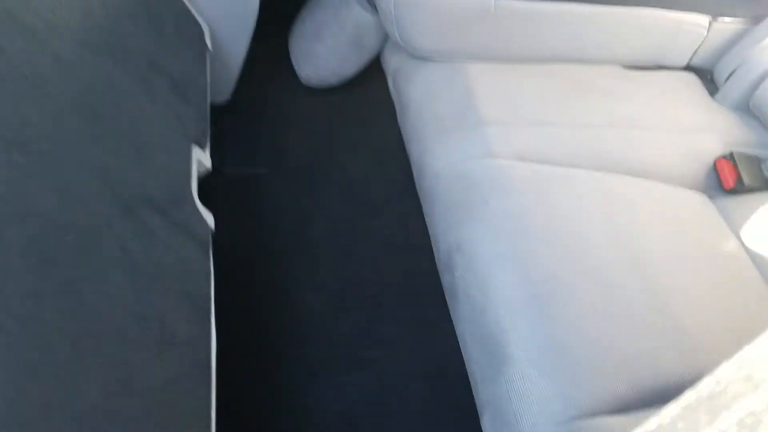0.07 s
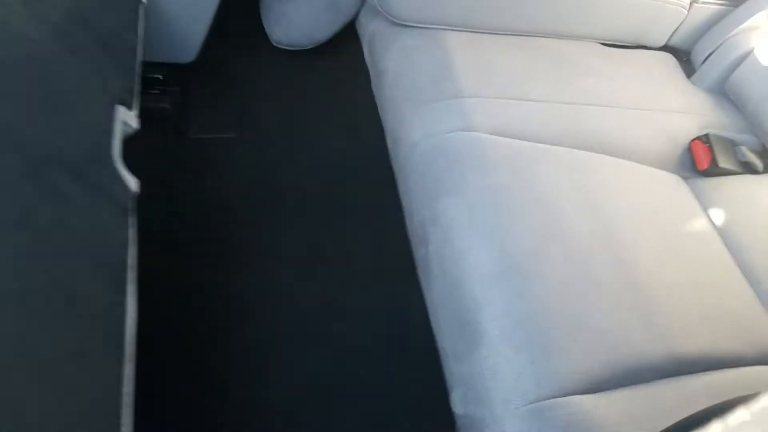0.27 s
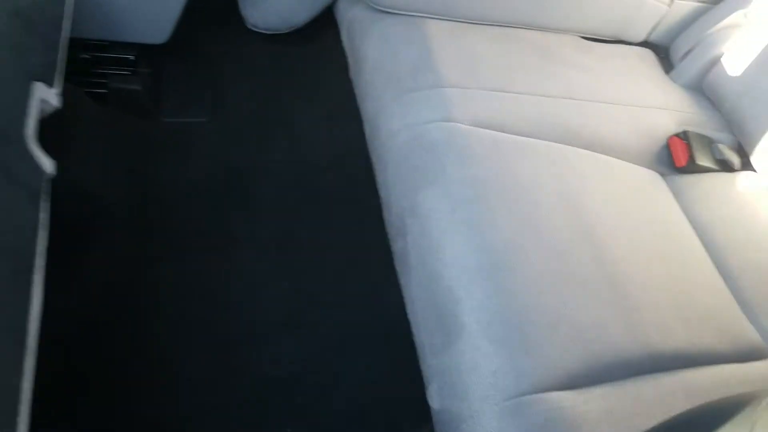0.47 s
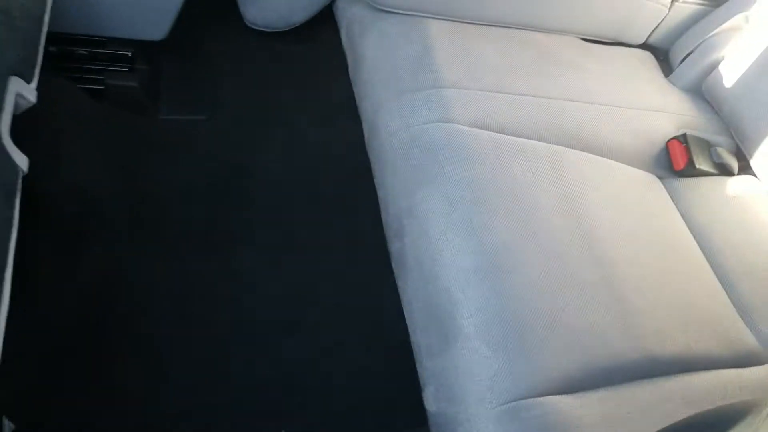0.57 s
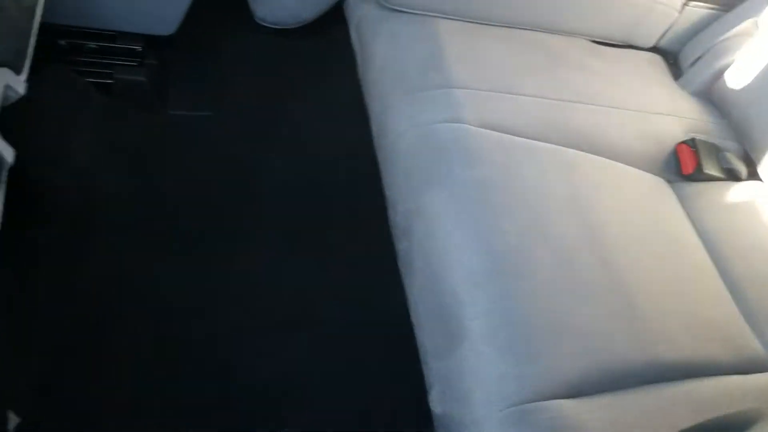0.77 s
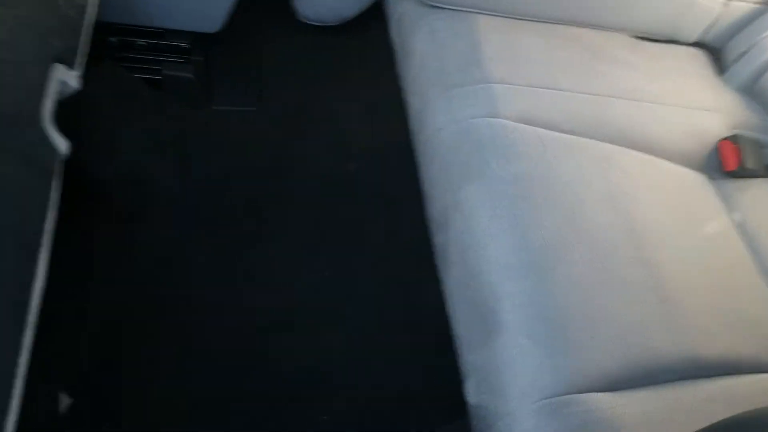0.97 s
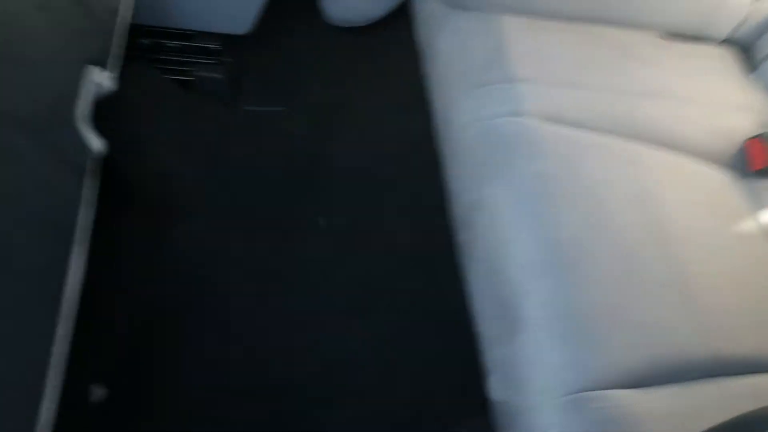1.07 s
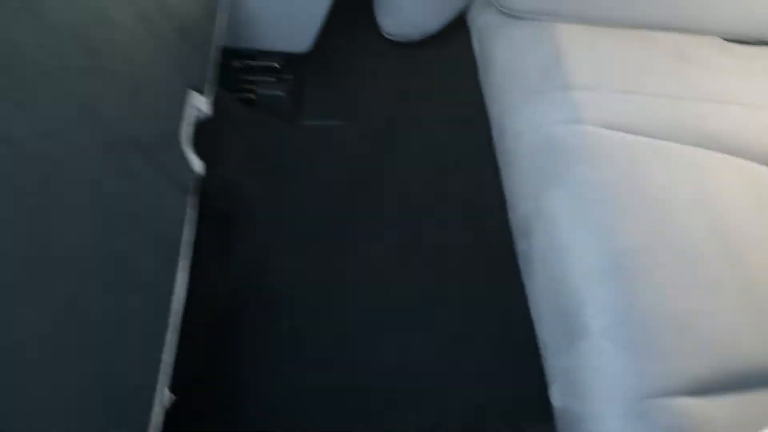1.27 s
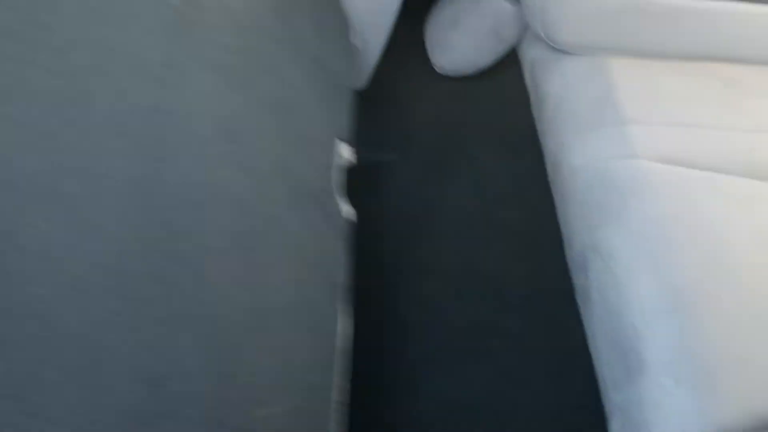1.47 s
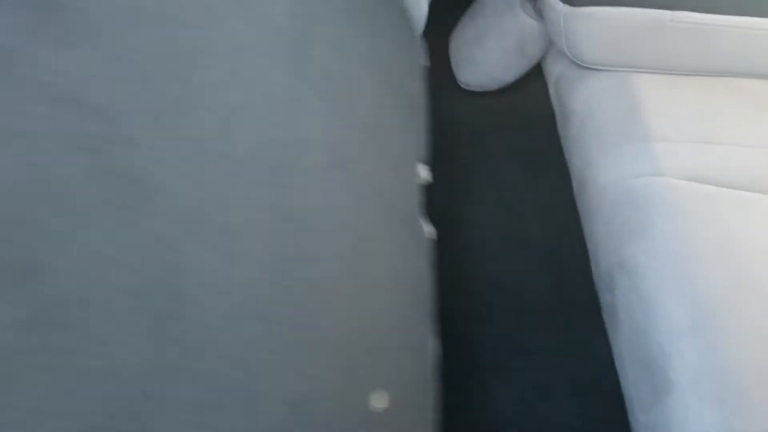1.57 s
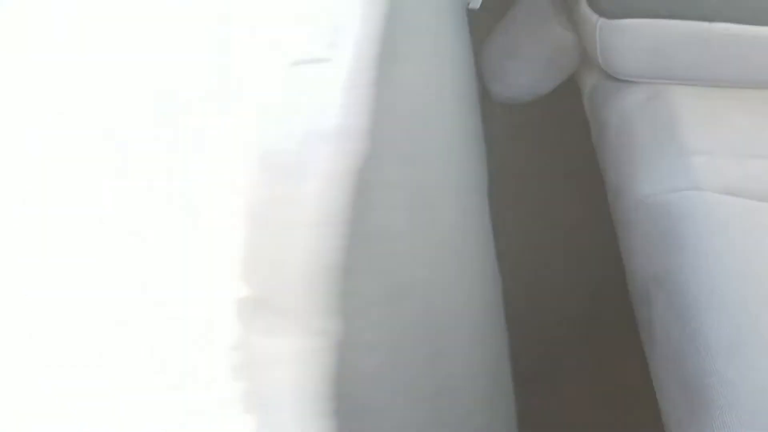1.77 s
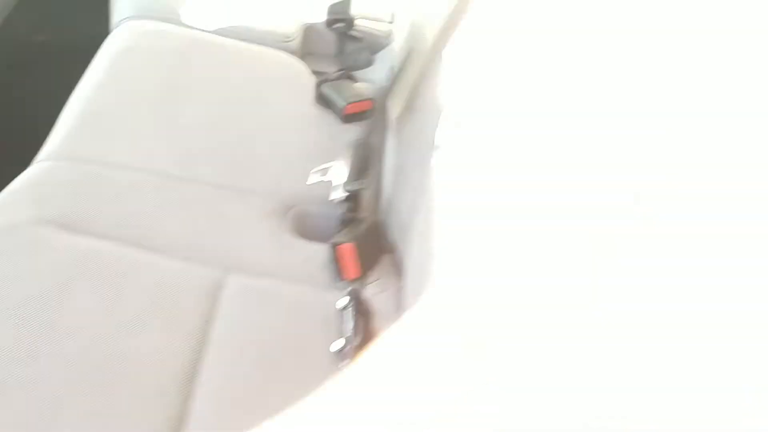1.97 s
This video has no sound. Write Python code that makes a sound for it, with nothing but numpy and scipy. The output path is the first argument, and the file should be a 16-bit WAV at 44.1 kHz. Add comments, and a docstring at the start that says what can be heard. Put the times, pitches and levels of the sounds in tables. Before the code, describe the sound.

A car seat swings over with soft cloth rustling, then locks with a sharp metallic snap and a dull thump, rebounding with light clicks. It is heard close and slightly right, over a faint low hum in the cabin.

```python
"""Swinging a car seat back over

Inside a parked car, over a faint low hum, upholstery rubs and rustles as the seat back moves.
The steel latch snaps, and the padded frame thumps against its stop, rebounds and rattles.
A small click and more rustling follow. Cloth is shaped noise; blows add ringing tones."""
import sys
import numpy as np
from scipy import signal
from scipy.fft import rfft, irfft, next_fast_len
from scipy.io import wavfile

SR = 44100
rng = np.random.default_rng(int(sys.argv[2]) if len(sys.argv) > 2 else 0)


def generate_wav(sig):
    """Save sig (samples, or channels by samples) to the path in sys.argv[1] as 16-bit PCM at SR."""
    pcm = np.round(np.clip(np.atleast_2d(sig).T, -1, 1) * 32767).astype(np.int16)
    wavfile.write(sys.argv[1], SR, pcm)


N = 88332
T = np.arange(N) / SR


def from_db(db):
    """Turn decibels into a number to multiply by."""
    return np.exp(np.maximum(db, -200) * np.log(10) / 20)


def unit_power(x):
    """Scale a sound so its average power is 1."""
    return x / np.sqrt(np.mean(x ** 2) + 1e-20)


def curve(rows):
    """Join (time, value) points with straight lines."""
    return np.interp(T, *np.transpose(rows))


def at_hz(rows, hz):
    """Read between (frequency, value) points, with octaves evenly spaced."""
    freqs, values = np.transpose(rows)
    return np.interp(np.log(hz + 1), np.log(freqs), values)


def drift(rate_hz):
    """A random wander of about 1 either way, mostly slower than rate_hz."""
    hz = np.fft.rfftfreq(N, 1 / SR)
    return unit_power(irfft(rfft(rng.standard_normal(N)) / (1 + (hz / rate_hz) ** 2), N))


# Each row: frequency in Hz, how alike left and right are (1 is the same, 0 unrelated).
LIKENESS = [(60, 0.23), (330, 0.71), (700, 0.32), (1500, 0.11), (6000, -0.059), (14000, -0.056)]
def noise(colour, grain_db):
    """Stereo noise with a given tone colour; grain_db roughens it like tiny uneven contacts."""
    size = next_fast_len(N, True)
    hz = np.fft.rfftfreq(size, 1 / SR)
    grains = rng.standard_normal((2, size)) * from_db(grain_db * rng.standard_normal(size).clip(-2, 2))
    shared, apart = rfft(grains) * from_db(at_hz(colour, hz))
    alike = np.clip(at_hz(LIKENESS, hz), -1, 1)
    spectrum = np.sqrt(1 + alike) * shared + np.sqrt(1 - alike) * apart * [[1], [-1]]
    return unit_power(irfft(spectrum, size)[:, :N])


def bursts(rows, rise_s, fade_s):
    """The loudness of blows that rise and die away. A fade time is the time to drop 60 dB."""
    power = 0
    for start, db, *_ in rows:
        age = np.maximum(T - start, 0)
        rise = np.minimum(age / rise_s, 1)
        fall = from_db(db - 60 * np.maximum(age - rise_s, 0) / fade_s)
        power = power + (rise * fall) ** 2
    return np.sqrt(power)


def push(start, db, contact_s):
    """One smooth shove; a longer contact sounds duller."""
    progress = np.maximum(T - start, 0) / max(contact_s, 2 / SR)
    force = np.sin(np.pi * np.minimum(progress, 1)) ** 2
    return from_db(db) * force / force.sum()


def ring(force, tones):
    """A struck object rings at its own fading tones, giving off little below their pitch."""
    out = 0
    for hz, db, fade_s in tones:
        decay = np.exp(-np.log(1000) / (fade_s * SR))
        feedback = [1, -2 * decay * np.cos(2 * np.pi * hz / SR), decay * decay]
        out = out + from_db(db) * signal.lfilter([.5, 0, -.5], feedback, force + 1e-18)
    return out


def rough_rings(rows, wobble):
    """Tones that swell and fade; the pitch shakes fast, by the share of itself set by wobble."""
    out = 0
    for start, db, rise_s, fade_s, hz in rows:
        phase = 2 * np.pi * np.cumsum(hz * (1 + wobble * drift(hz / 2))) / SR
        out = out + bursts([(start, db)], rise_s, fade_s) * np.sqrt(2) * np.sin(phase)
    return out


# The hum's tone colour. Each row: frequency in Hz, relative level in dB.
HUM_COLOUR = [(20, -7), (45, -33), (68, 3.5), (95, -7), (200, -7), (500, -9.5), (1500, -22), (5000, -40.5)]
def cabin_hum():
    """A faint, steady, low noise fills the cabin."""
    return from_db(-53) * noise(HUM_COLOUR, grain_db=0)


# How loud the rubbing is. Each row: time in seconds, level in dB.
RUB_LEVEL = [(0, -47.5), (.08, -47), (.17, -44), (.3, -44.5), (.4, -47.5), (.52, -49.5), (.62, -54.5),
             (.8, -55), (.9, -46.5), (.95, -53), (1.08, -51), (1.18, -40.5), (1.33, -33.5), (1.45, -35.5),
             (1.53, -33), (1.65, -47.5), (1.85, -48.5), (2, -50.5)]
# Its tone colour. Each row: frequency in Hz, relative level in dB.
RUB_COLOUR = [(40, -69), (140, -15.5), (250, -9.5), (380, -0.5), (480, -5), (900, -4.5), (1080, -9),
              (1270, -8.5), (2000, -14.5), (3200, -32.5), (6000, -34), (16000, -57)]
# Its hollow note. Each row: time in seconds, pitch in Hz.
HOLLOW_PITCH = [(.3, 260), (.6, 340), (.9, 470), (1.02, 490), (1.15, 330), (1.5, 410)]
def padding_rub():
    """The padding rubs dully and stirs a hollow note that shifts as the seat swings."""
    width_hz = 104
    phase = 2 * np.pi * np.cumsum(curve(HOLLOW_PITCH)) / SR
    hollow = unit_power(drift(width_hz) * np.cos(phase) + drift(width_hz) * np.sin(phase))
    return from_db(curve(RUB_LEVEL)) * (noise(RUB_COLOUR, grain_db=3) + from_db(-5) * hollow)


# How loud the rustle is. Each row: time in seconds, level in dB.
RUSTLE_LEVEL = [(0, -54), (.3, -59.5), (.55, -59.5), (.64, -50), (.72, -52), (.8, -49), (.89, -49.5),
                (.96, -54.5), (1.2, -52.5), (1.36, -46), (1.52, -46.5), (1.66, -52.5), (1.8, -47.5),
                (1.9, -46.5), (1.96, -39), (2, -35.5)]
# Its tone colour. Each row: frequency in Hz, relative level in dB.
RUSTLE_COLOUR = [(300, 4), (1200, 6), (2000, 1.5), (3000, 2), (4500, -2.5), (7000, 1), (8300, -5.5),
                 (9700, -9.5), (11500, 0), (15500, 2)]
def cloth_rustle():
    """Cloth brushes over cloth, its level fluttering by about 1 dB."""
    return from_db(curve(RUSTLE_LEVEL) + drift(rate_hz=40)) * noise(RUSTLE_COLOUR, grain_db=2.5)


# The rasps. Each row: time of the peak in seconds, peak level in dB, half-width in seconds.
RASPS = [(0.646, -49, 0.061), (0.789, -49, 0.043), (.89, -51, 0.038), (1.33, -52, 0.21),
         (1.85, -46.5, 0.39)]
# Their tone colour. Each row: frequency in Hz, relative level in dB.
RASP_COLOUR = [(300, -18), (1400, -1), (2050, 2.5), (2500, -2.5), (3400, -11.5), (6800, -10.5),
               (9500, -22.5), (14000, -15)]
def cover_rasps():
    """The cloth cover rasps in smooth swells as it stretches."""
    stretch = sum(from_db(db) * np.exp(-((T - peak) / width) ** 2) for peak, db, width in RASPS)
    return stretch * noise(RASP_COLOUR, grain_db=3.5)


# Soft bumps. Each row: start in seconds, level in dB, rise and fade in seconds, pitch in Hz.
BUMPS = [(.02, -44, .005, .15, 210), (.865, -44, .04, .16, 440), (1.615, -39, .015, .28, 165),
         (1.708, -30.5, .013, .055, 330), (1.731, -34.5, .006, .06, 300), (1.975, -34, .022, .1, 330)]
def cushion_bumps():
    """The padding makes muffled bumps as it shifts and rebounds."""
    return rough_rings(BUMPS, wobble=.35)


# The blow on the trim. Each row: start in seconds, level in dB, contact time in seconds.
KNOCKS = [(.023, -36, 0.00033)]
# The trim's tones. Each row: pitch in Hz, level in dB, fade in seconds.
TRIM_TONES = [(643, 4.1, 0.056), (868, 1.9, 0.04)]
def trim_knock():
    """A short blow makes the trim ring with a hollow knock."""
    return ring(sum(push(*row) for row in KNOCKS), TRIM_TONES)


# Pings. Each row: start in seconds, level in dB, rise and fade in seconds, pitch in Hz.
PINGS = [(.328, -53, .001, .04, 2950), (1.585, -46, .008, .22, 5900), (1.7915, -41, .001, .04, 2400)]
# Clicks. Each row: start in seconds, level in dB, tilt toward the treble in dB per octave.
CLICKS = [(.329, -50, -2.5), (1.514, -33, -4), (1.526, -34, -4), (1.537, -26, -2.5), (1.548, -26.5, -3),
          (1.559, -32, .5), (1.619, -42, -2), (1.626, -39.5, -1.5), (1.6325, -34.5, .5), (1.661, -39, -1),
          (1.682, -41.5, -.5), (1.7905, -36.5, -2.5), (1.807, -44, 3), (1.9165, -36.5, -2),
          (1.9232, -27, 1.5), (1.926, -29.5, .5), (1.957, -39, -3), (1.971, -36.5, -3)]
# The clicks' tone colour before tilting. Each row: frequency in Hz, relative level in dB.
CLICK_COLOUR = [(100, -19), (1200, 8), (2000, 20), (2900, 14.5), (4600, 6.5), (7000, 11), (9500, 2.5),
                (11500, 7.5), (15500, 8)]
def pings_and_clicks():
    """Small parts ping and click, each click with its own brightness; some clicks add crunch to the frame's
    first blows and fill out the tail of the latch's snap."""
    out = rough_rings(PINGS, wobble=.097)
    for start, db, tilt in CLICKS:
        colour = [(hz, band_db + tilt * np.log2(hz)) for hz, band_db in CLICK_COLOUR]
        out = out + bursts([(start, db)], rise_s=.001, fade_s=.035) * noise(colour, grain_db=2.5)
    return out


# The latch's snaps. Each row: start in seconds, level in dB.
SNAPS = [(1.5092, -16), (1.5128, -19)]
# The crack's tone colour. Each row: frequency in Hz, relative level in dB.
SNAP_COLOUR = [(100, -38), (400, -14), (950, 9.5), (2000, -0.5), (4000, -8.5), (5400, -2.5), (6800, 8),
               (8300, 2), (9700, -7), (11000, 4.5), (15500, 3)]
# The steel's tones. Each row: pitch in Hz, level in dB, fade in seconds.
LATCH_TONES = [(950, -19, 0.048), (1904, -19.5, 0.047), (5490, -26, 0.19), (6190, -16.5, 0.1),
               (6980, -19, 0.021), (7350, -14, 0.08)]
def latch_snap():
    """The catch snaps over on the right: a bright crack, a brief steel ring and a short cabin echo."""
    crack = bursts(SNAPS, rise_s=.00051, fade_s=.036)
    echo = from_db(-13) * bursts(SNAPS, rise_s=.0074, fade_s=.17)
    steel = ring(sum(push(start, db, contact_s=0) for start, db in SNAPS), LATCH_TONES)
    snap = (crack + echo) * noise(SNAP_COLOUR, grain_db=0) + steel
    return snap * from_db([[-1.25], [1.25]])  # left down, right up


# The frame hits its stop. Each row: start in seconds, level in dB, contact time in seconds.
THUMPS = [(1.5382, -13, .0018), (1.551, -13.5, .0022), (1.5582, -14.5, .0024), (1.6, -34, .002),
          (1.7193, -32, .0018), (1.991, -34, .002)]
# The tones of frame and cabin. Each row: pitch in Hz, level in dB, fade in seconds.
FRAME_TONES = [(147, -4, 0.072), (226, 4, 0.066), (296, 0, 0.038), (389, -7.5, 0.13), (421.5, -10.5, 0.16),
               (530, -19, 0.1), (645, -3, 0.1), (718.3, 5.5, 0.07)]
# The thud's tone colour. Each row: frequency in Hz, relative level in dB.
THUD_COLOUR = [(30, -17), (65, -6), (140, 5.5), (400, 8.5), (750, -1), (1000, -6), (2000, -5.5),
               (4000, -22.5), (15000, -38)]
def frame_thump():
    """Padded blows ring the frame; cushions and cabin add a thud, and the air booms at the first blow."""
    body = ring(sum(push(*row) for row in THUMPS), FRAME_TONES)
    thud = from_db(-9.5) * bursts(THUMPS, rise_s=.001, fade_s=.08)
    tail = from_db(-21) * bursts(THUMPS, rise_s=.001, fade_s=.36)
    boom_hz = 61
    boom = from_db(-15) * bursts(THUMPS[:1], rise_s=.028, fade_s=.15) * np.sin(2 * np.pi * boom_hz * T)
    return body + boom + (thud + tail) * noise(THUD_COLOUR, grain_db=3)


# The stereo balance. Each row: frequency in Hz, left level minus right level in dB.
LEAN = [(50, -4.5), (200, -2), (500, -1), (1300, -6), (2800, -1), (8000, -1.5)]
def lean_right(x):
    """Shift the sound to the right, by a different amount at each frequency."""
    size = next_fast_len(N + SR // 10, True)
    lean_db = at_hz(LEAN, np.fft.rfftfreq(size, 1 / SR))
    return irfft(rfft(x, size) * from_db([lean_db / 2, -lean_db / 2]), size)[:, :N]


def scene():
    """The seat is close by and a little to the right."""
    hum = cabin_hum()
    upholstery = padding_rub() + cloth_rustle() + cover_rasps()
    blows = latch_snap() + frame_thump() + cushion_bumps() + trim_knock() + pings_and_clicks()
    return lean_right(hum + upholstery + blows)


def record(dry):
    """Cut off the very highest treble steeply."""
    cutoff_hz = 15950
    return signal.sosfilt(signal.ellip(12, .1, 80, cutoff_hz, fs=SR, output="sos"), dry)


dry = scene()
out = record(dry)
generate_wav(out)
```